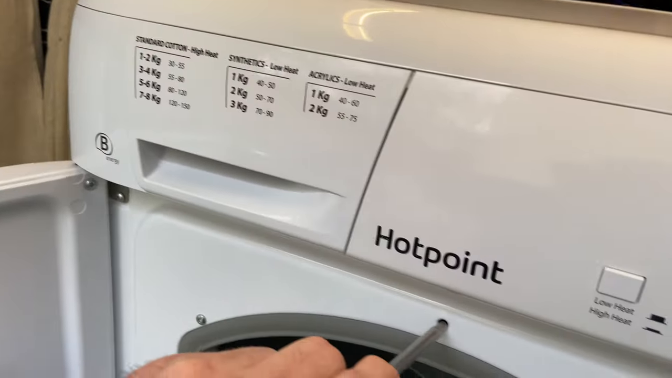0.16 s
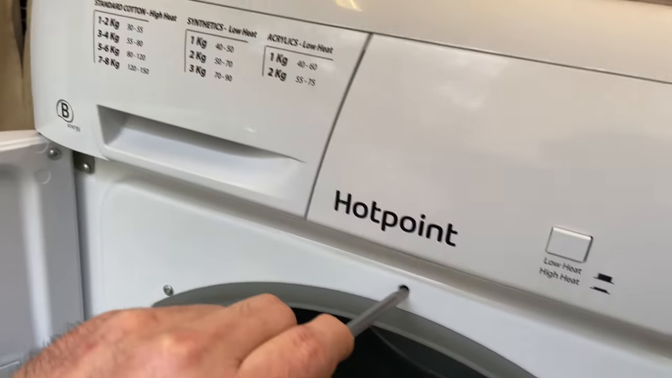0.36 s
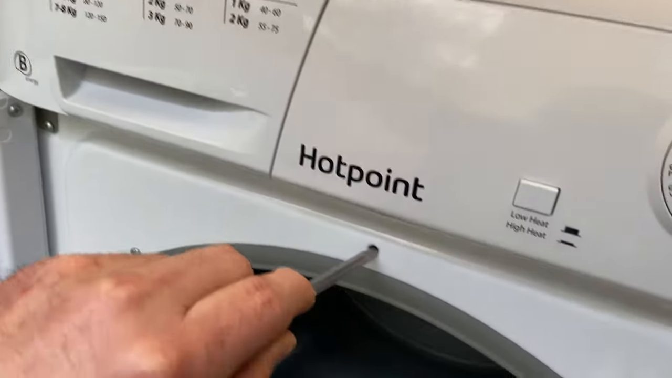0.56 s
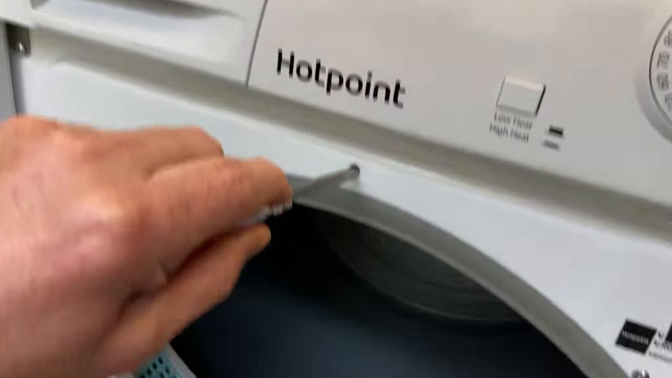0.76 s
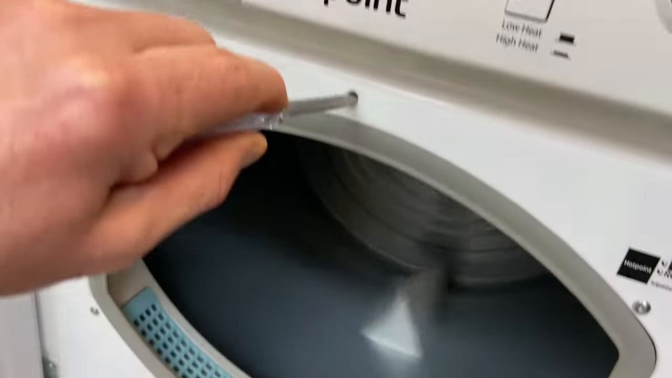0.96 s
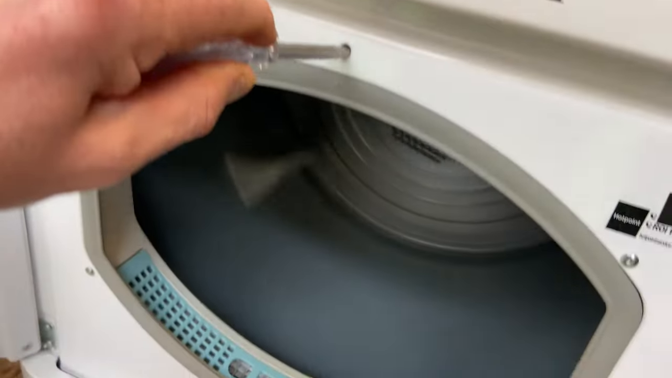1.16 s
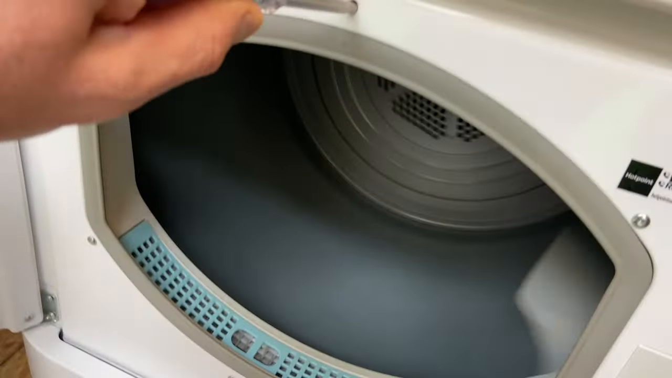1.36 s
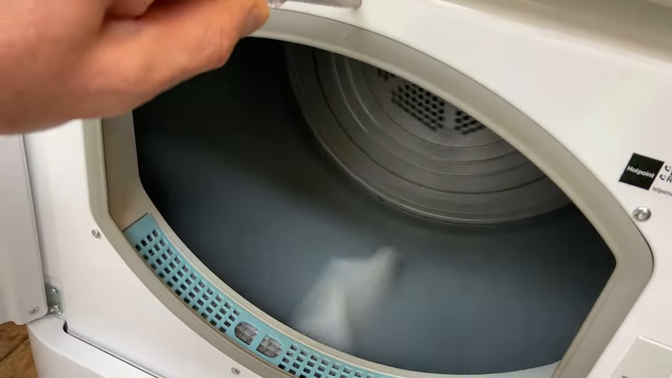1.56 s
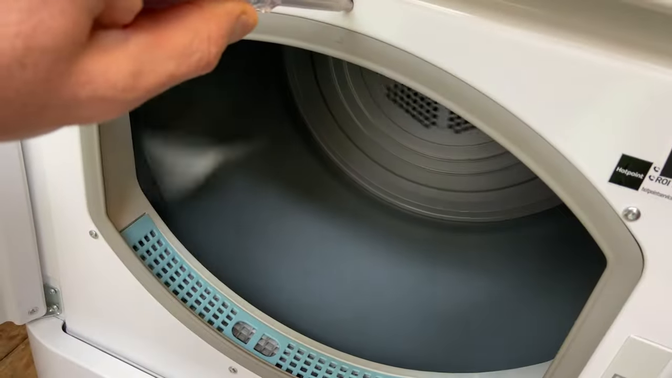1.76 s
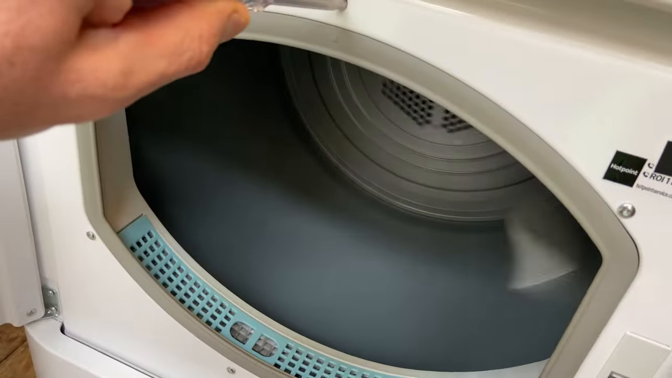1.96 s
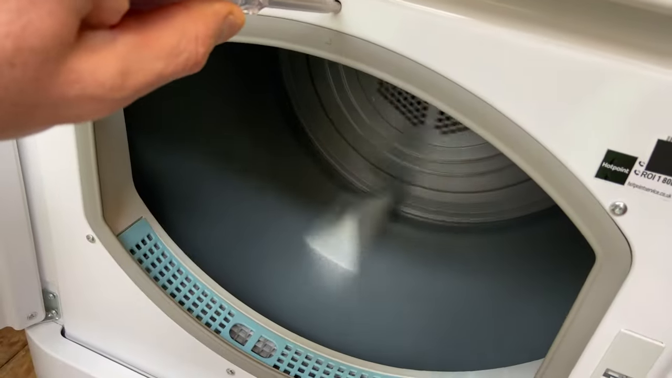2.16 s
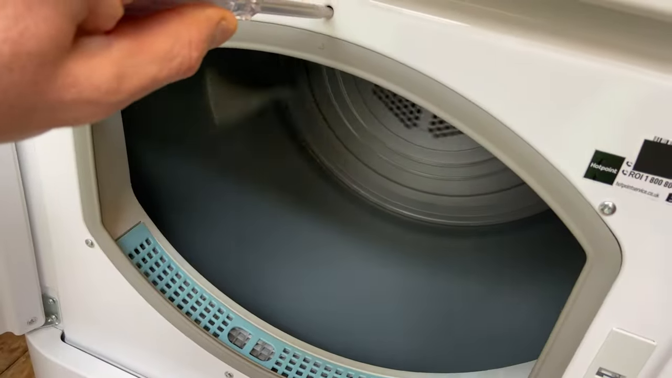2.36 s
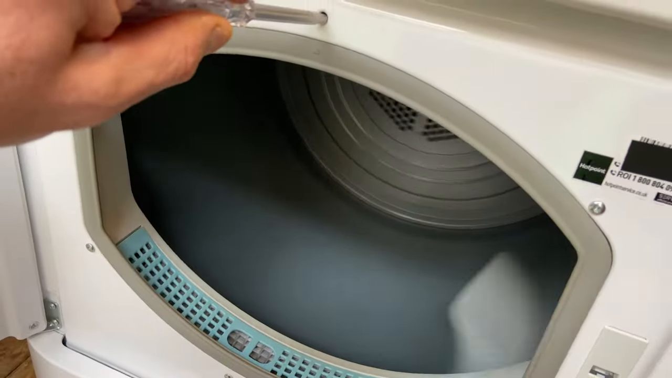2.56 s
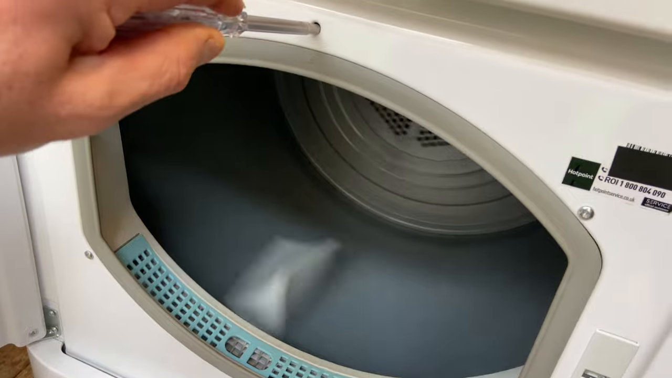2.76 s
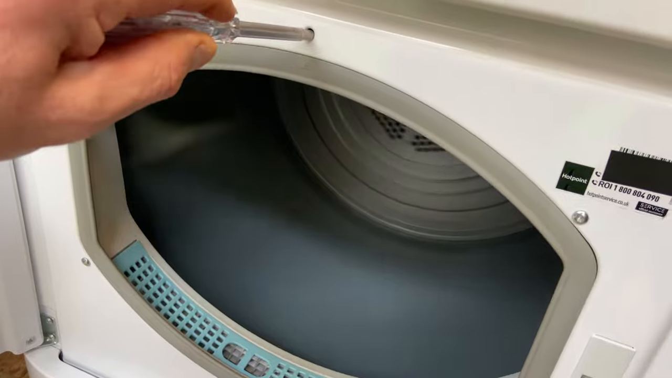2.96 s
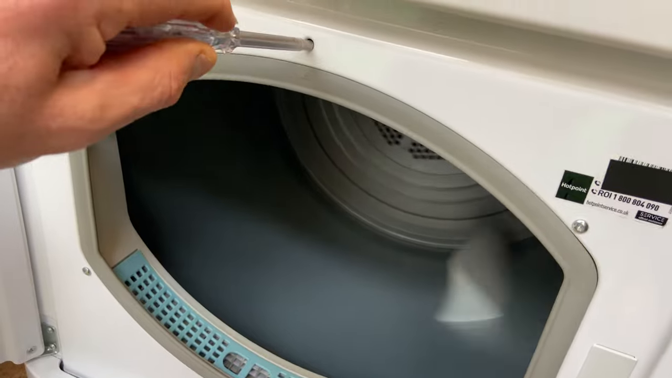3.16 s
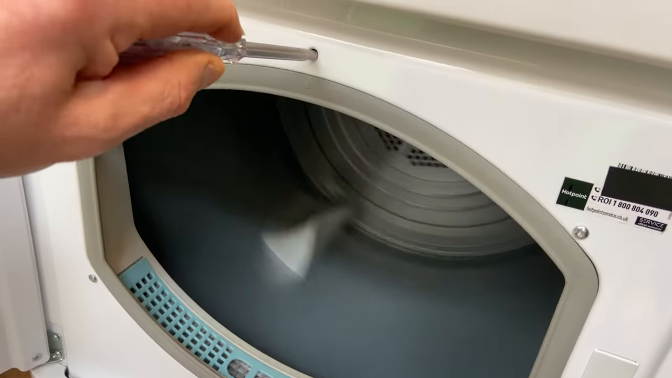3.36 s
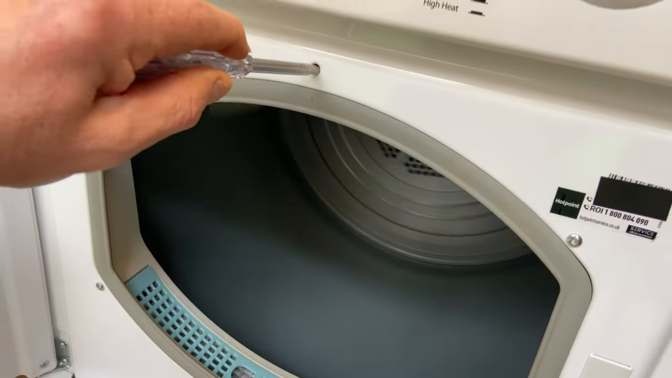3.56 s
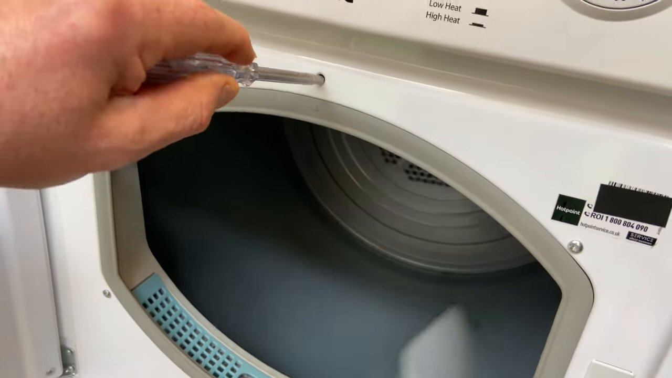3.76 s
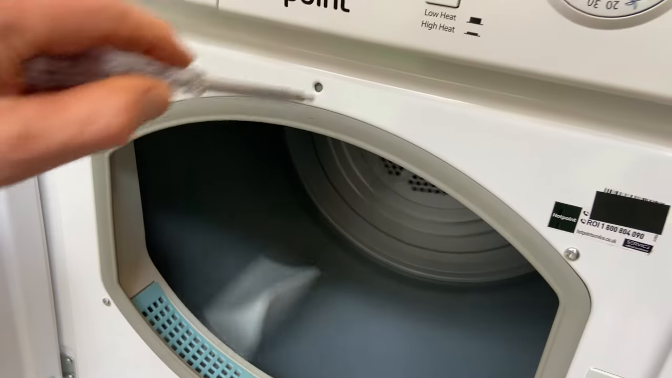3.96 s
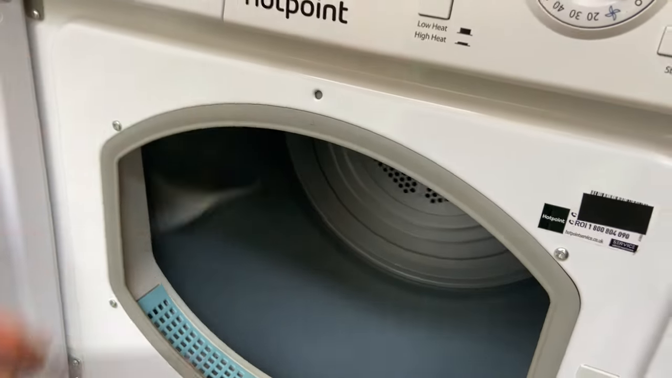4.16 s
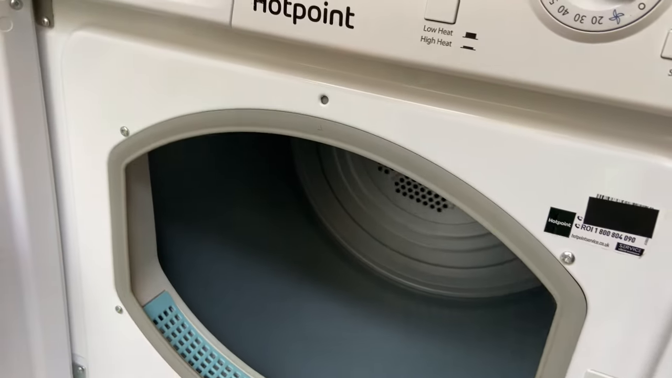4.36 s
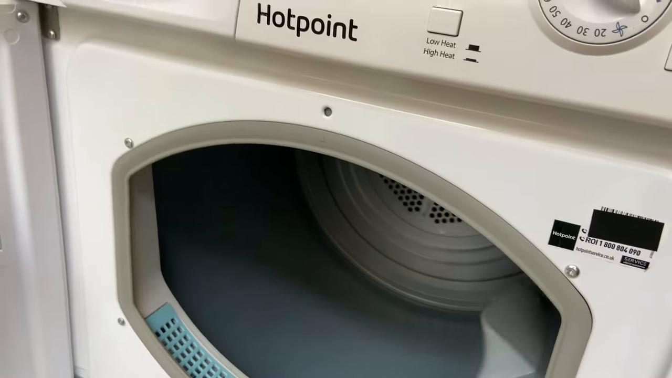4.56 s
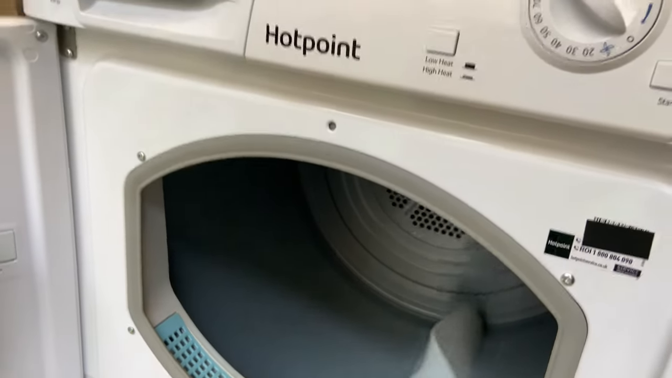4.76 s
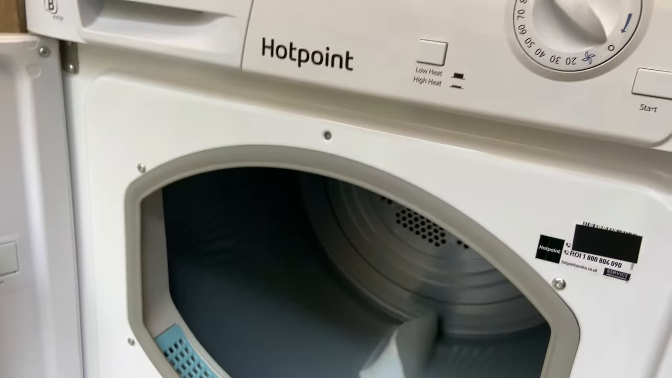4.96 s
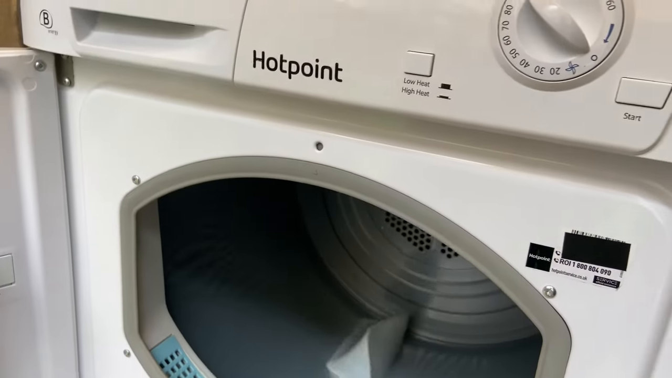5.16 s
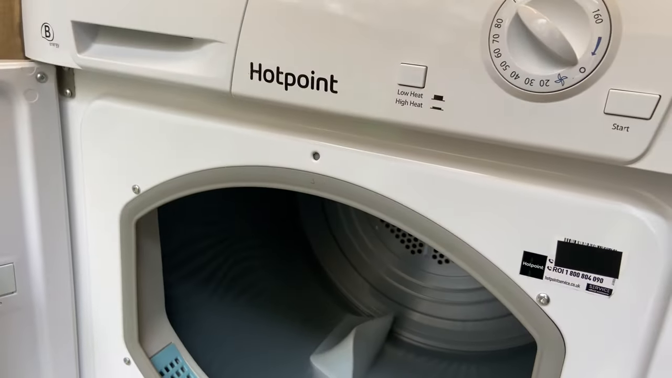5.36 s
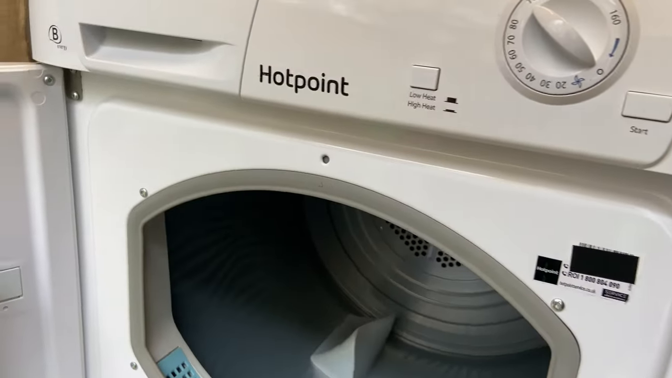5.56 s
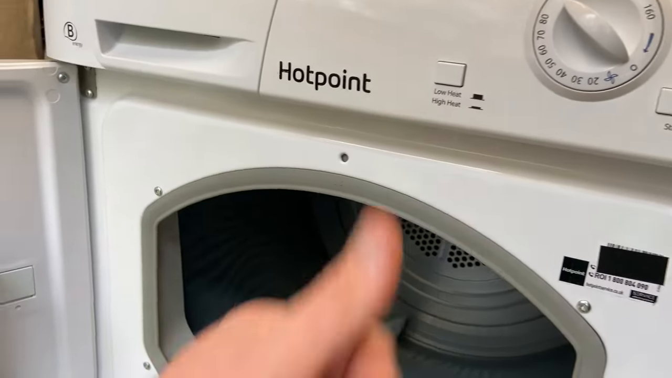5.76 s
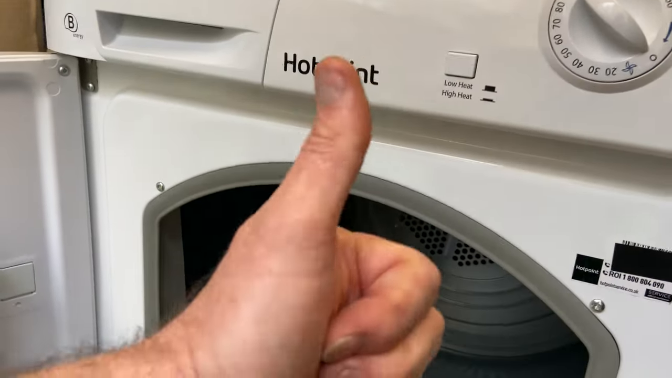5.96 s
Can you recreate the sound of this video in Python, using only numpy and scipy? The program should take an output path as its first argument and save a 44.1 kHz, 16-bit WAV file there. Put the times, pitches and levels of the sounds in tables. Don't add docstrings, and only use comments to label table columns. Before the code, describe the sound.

Indoors, a dryer runs with its door open: low fluttering hum, hollow rushing air and a faint wavering whistle, constant for nearly four seconds. After a light scrape and bright click, the hum drops away quickly and the whoosh sinks. About a second later the metal drum bangs and rattles to a stop, with short high squeaks, then soft low bumps in a quiet room, heard close in stereo.

```python
import sys
import numpy as np
from scipy import signal
from scipy.fft import rfft, irfft, next_fast_len
from scipy.io import wavfile

SR = 44100
rng = np.random.default_rng(int(sys.argv[2]) if len(sys.argv) > 2 else 0)


def output_pcm(signal):
    pcm = np.clip(np.atleast_2d(signal).T, -1, 1) * 32767
    wavfile.write(sys.argv[1], SR, np.round(pcm).astype(np.int16))


def ratio_of_db(decibels):
    return 10 ** (np.asarray(decibels, float) / 20)


N = 264600
POWER_OFF_S = 3.793

# pitch_hz, level_db (per Hz)
ROOM_TONE = [(30, -14), (45, 6.5), (75, -2.5), (140, -8), (250, -16), (500, -25), (1100, -26),
             (2000, -37.5), (3000, -57.5)]
# pitch_hz, likeness (1 = same)
LIKENESS = [(60, 1), (130, 1), (290, 0.82), (640, 0.65), (1410, 0.77), (2150, 0.5), (3100, 0.58),
            (4400, 0.54), (6000, 0.051), (7500, 0.069)]
# pitch_hz, left_minus_right_db
LEFT_DB = [(60, 1.5), (110, -3), (200, 2.5), (380, 0), (700, 3), (1290, 0), (2380, 3), (4400, 3.0),
           (8120, 7.5), (15000, -6.5)]
# start_s, length_s, level_db
SCRAPES = [
    (3.72, 0.12, -41),
    (3.922, 0.094, -46.5),
    (4.07, .09, -53.5),
]
# start_s, length_s, level_db
SQUEAKS = [
    (4.732, 0.028, -49),
    (4.809, 0.047, -53),
    (4.923, .033, -54.5),
]
# pitch_hz, level_db, t60_s
SEAL_MODES = [(3720, -1, .03), (4200, -7, .02), (4930, 0, .035), (7380, -7, .03), (9650, -9, .025),
              (11900, -13, .025), (14000, -12, .02), (15000, -13, .025)]
# start_s, peak_db, pitch_hz
ROCKING = [
    (4.13, -41, 76),
    (4.615, -39.5, 76),
    (5.16, -49.5, 187.4),
    (5.199, -44, 183),
    (5.439, -44.5, 179.5),
    (5.648, -44, 184),
    (5.74, -50, 140),
    (5.839, -45.5, 185),
]
# start_s, level_db, hardness_hz
THUDS = [(4.7206, -23, 400), (4.725, -15.5, 386), (4.748, -19, 330), (4.760, -36, 347), (4.813, -12.5, 242),
         (4.851, -20, 233), (4.878, -27, 180), (4.9215, -26.5, 237), (4.989, -25.5, 277), (5.009, -35, 278),
         (5.046, -28.5, 283), (5.072, -35, 232)]
# pitch_hz, level_db, t60_s
THUD_MODES = [(134.5, -35, 0.085), (169, -8, 0.13), (200.3, -3, 0.14), (250.5, 2.5, 0.064),
              (304, -19, 0.033)]
# start_s, panel_ring_db, crack_db, crack_colour_hz, bright_snap_db
TICKS = [
    (3.809, -60, -32, 4000, -33),
    (4.7201, -17, -19.5, 2360, -24.5),
    (4.725, -34, -32, 2300, -48),
    (4.74, -41, -50, 2300, -52),
    (4.761, -38, -43, 2000, -58),
    (4.809, -35, -26.5, 2200, -38),
    (4.845, -53, -31.5, 2980, -49),
    (4.9852, -50, -28, 1900, -53),
    (5.046, -46.5, -45, 910, -62),
]
# pitch_hz, level_db, t60_s
PANEL_MODES = [(412, -7.5, 0.13), (524, -10, 0.11), (710, -16, 0.093), (989, -1.5, 0.047),
               (1010, -19.5, 0.034), (1107, 0.5, 0.03), (1167, -8, .03), (1780, -16, 0.022),
               (2136, -14.5, .05), (2300, -16, 0.089), (2540, -22, 0.037), (4060, -24, .015),
               (5370, -15.5, 0.017)]
# time_s, level_db
NEARNESS = [(0, -0.5), (.45, -1), (.9, .5), (1.35, 1), (1.55, 0.5), (2.1, 0), (2.55, 0), (3.1, 0),
            (3.55, 0), (3.78, 0), (4, -1)]
# pitch_hz, level_db (per Hz)
HISS = [(2000, 1.5), (3200, -1.5), (4300, -0.5), (5300, -5.5), (6200, -8.5), (7500, -10.5), (10000, -10),
        (16000, -12.5)]
# pitch_hz, level_db (per Hz)
RUSH = [(350, 1), (550, -0.5), (800, 1), (1200, -3), (1800, -7), (2600, -15.5), (4000, -15.5)]
# pitch_hz, level_db (per Hz)
RUMBLE = [(30, -33), (45, -23.5), (70, -3), (110, -4.5), (145, 3.5), (210, -10), (370, -4.5), (600, -20.5)]
# pitch_hz, width_hz, lift_db
CAVITY = [(80, 12, 4), (250, 40, 3), (310, 22, -8), (498, 40, -8), (555, 50, 4), (730, 50, -5),
          (775, 40, 6), (845, 40, 4), (920, 40, 4), (990, 80, -9), (1110, 60, 3), (1330, 110, -6),
          (1415, 60, 6.5), (1490, 50, 4.5), (2090, 80, -4)]
# time_s, turns_per_s
ROTOR = [
    (0, 45.2),
    (3.81, 45.2),
    (4.2, 36.0),
    (4.6, 25.0),
]
# pitch_hz, lead_radians
RIGHT_LEAD = [(400, 0), (1000, -.4), (1700, -.8), (2400, -.4), (3100, -.8), (4200, .2), (5400, .8),
              (6200, -.3)]


def in_time(rows):
    s, value = np.transpose(rows)
    return np.interp(np.arange(N) / SR, s, value)


def at_hz(points, hz):
    pitch_hz, value = np.transpose(points)
    return np.interp(np.log(hz), np.log(np.maximum(pitch_hz, 1)), value)


def since(s):
    return np.maximum(np.arange(N) / SR - s, 0)


def rms_one(x):
    return x / np.sqrt(np.mean(x ** 2) + 1e-20)


def band_pass(x, low_hz, high_hz, order=1):
    return signal.sosfilt(signal.butter(order, [low_hz, high_hz], "band", fs=SR, output="sos"), x)


def drift(rate):
    r = np.exp(-80 * np.pi * rate / SR)
    slow = signal.lfilter([1], [1, -2 * r, r * r], rng.standard_normal(N // 40 + 2002))[2000:]
    return np.interp(np.arange(N) / 40, np.arange(len(slow)), rms_one(slow))


def noise(spectrum, patchy_db, likeness=LIKENESS):
    lowest, highest = spectrum[0][0], spectrum[-1][0]
    edges = lowest * 2 ** np.arange(0, np.log2(highest / lowest) + .1, 1 / 3)
    out, together, white = 0, drift(8.6), rng.standard_normal((2, 2, N))
    for k, (low, high) in enumerate(zip(edges, edges[1:])):
        mid, side = band_pass(white[k % 2], low, high, order=2)
        hz = np.sqrt(low * high)
        alike = np.clip(at_hz(likeness, hz), -1, 1)
        flicker_db = patchy_db * (1.48 * together + drift(12.0))
        gain = ratio_of_db(at_hz(spectrum, hz) + flicker_db)
        pan = ratio_of_db(at_hz(LEFT_DB, hz) * np.array([[.5], [-.5]]))
        out = out + gain * pan * (np.sqrt(1 + alike) * mid + np.sqrt(1 - alike) * side * [[1], [-1]])
    return rms_one(out)


def ring(clicks, hz, t60):
    r, w = ratio_of_db(-60 / (t60 * SR)), 2 * np.pi * hz / SR
    return signal.lfilter([0, np.sin(w)], [1, -2 * r * np.cos(w), r * r], clicks + 1e-18)


def strike(push, modes, strengths):
    return sum(g * ratio_of_db(level_db) * ring(push, hz, t60) for g, (hz, level_db, t60) in zip(strengths, modes))


def room_tone():
    likeness = [(60, 0.98), (290, 0.68), (640, 0), (3000, 0.015)]
    return ratio_of_db(-47) * noise(ROOM_TONE, patchy_db=-0.3, likeness=likeness)


def reverberation(x):
    t60_s, wall_cut_hz = 0.48, 4900
    size = next_fast_len(N + SR)
    turn = np.exp(-2j * np.pi * np.arange(size // 2 + 1) / size)
    dull = np.exp(-2 * np.pi * wall_cut_hz / SR)
    wall = (1 - dull) / (1 - dull * turn)
    answer = np.zeros((2, len(turn)), complex)
    for k, lag in enumerate((rng.uniform(.011, .034, 12) * SR).astype(int)):
        loop = ratio_of_db(-60 * lag / SR / t60_s) * wall * turn ** lag
        answer[k % 2] += (-1) ** (k // 2) * loop / (1 - loop)
    return irfft(rfft(x, size) * answer, size)[:, :N]


def scrapes():
    t, stroke = np.arange(N) / SR, np.zeros(N)
    for s, length_s, level_db in SCRAPES:
        stroke += ratio_of_db(level_db) * np.sin(np.pi * np.clip((t - s) / length_s, 0, 1))
    return stroke * rms_one(band_pass(rng.standard_normal((2, N)), 2500, 9000))


def squeaks():
    t, rub = np.arange(N) / SR, np.zeros(N)
    for s, length_s, level_db in SQUEAKS:
        rub += ratio_of_db(level_db) * np.sin(np.pi * np.clip((t - s) / length_s, 0, 1) ** 0.58)
    rub = 0.078 * rub * rng.standard_normal(N)
    return strike(rub, SEAL_MODES, np.ones(len(SEAL_MODES))) * ratio_of_db([[1.5], [-1.5]])


def rocking():
    out, t = np.zeros(N), np.arange(round(.12 * SR)) / SR
    swell = t / 0.01 * np.exp(1 - t / 0.015)
    for s, level_db, hz in ROCKING:
        at = round(s * SR)
        bump = ratio_of_db(level_db - 0.5) * swell * np.sin(2 * np.pi * hz * t)
        out[at:at + len(t)] += bump[:N - at]
    return out * ratio_of_db([[-1.1], [1.1]])


def drum_thud(t, hardness_hz):
    thud = strike(-1. * (t == 0), THUD_MODES, ratio_of_db(0.76 * rng.standard_normal(len(THUD_MODES))))
    thud = signal.sosfilt(signal.butter(3, hardness_hz, fs=SR, output="sos"), thud)
    return signal.sosfilt(signal.butter(3, 125.0, "high", fs=SR, output="sos"), thud)


def panel_tick(t, panel_db, crack_db, colour_hz, snap_db):
    touches_per_s = 500
    touches = rng.standard_normal(len(t)) * (rng.random(len(t)) < touches_per_s / SR)
    chatter = ratio_of_db(-10.5 - 60 * t / 0.073) * touches
    strengths = ratio_of_db(1.5 * rng.standard_normal((len(PANEL_MODES), 2, 1)))
    swell = np.minimum(t / 0.0034, 1)
    panel = swell * strike((t == 0) + chatter, PANEL_MODES, strengths)

    white = rng.standard_normal((2, len(t)))
    dying = np.minimum(t / 0.002, 1) * ratio_of_db(-60 * t / 0.023) + ratio_of_db(-10 - 60 * t / 0.17)
    burst = dying * white
    crack = band_pass(burst, colour_hz / 1.45, colour_hz * 1.45, order=2)
    crack = crack + ratio_of_db(-12 - 60 * t / .03) * band_pass(burst, 1500, 6000)

    snap = (ratio_of_db(-60 * t / 0.0086) + ratio_of_db(-18 - 60 * t / 0.14)) * white
    snap = band_pass(snap, 4500, 11000)
    return ratio_of_db(panel_db) * panel + ratio_of_db(crack_db) * crack + ratio_of_db(snap_db) * snap


def knocks():
    out, size = np.zeros((2, N + SR)), SR // 4
    t = np.arange(size) / SR
    for s, level_db, hardness_hz in THUDS:
        at = round(s * SR)
        out[:, at:at + size] += ratio_of_db(level_db) * drum_thud(t, hardness_hz)
    for s, *tick in TICKS:
        at = round(s * SR)
        out[:, at:at + size] += panel_tick(t, *tick)
    return out[:, :N]


def coasting(running_db, first_fall, lingering_db, last_fall):
    gone = since(POWER_OFF_S)
    fall = np.maximum(ratio_of_db(-first_fall * gone), ratio_of_db(lingering_db - last_fall * gone))
    return ratio_of_db(running_db + in_time(NEARNESS)) * fall


def last_fade():
    return ratio_of_db(-np.minimum(260 * since(5.3) ** 2, 21))


def fan_hiss():
    gain = coasting(running_db=-43, first_fall=40, lingering_db=-4, last_fall=14.5)
    return ratio_of_db(2.5) * gain * last_fade() * noise(HISS, patchy_db=0.7)


def blades():
    blade_count, width_hz = 24, 5.6
    angle = 2 * np.pi * blade_count * np.cumsum(in_time(ROTOR)) / SR
    return ratio_of_db(-14) * (drift(width_hz) * np.cos(angle) + drift(width_hz) * np.sin(angle))


def cavity(x):
    for hz, width_hz, lift_db in CAVITY:
        g, q, c = ratio_of_db(lift_db / 2), np.pi * width_hz / SR, -2 * np.cos(2 * np.pi * hz / SR)
        x = signal.lfilter([1 + q * g, c, 1 - q * g], [1 + q / g, c, 1 - q / g], x)
    return x


def drum_air():
    rumble = coasting(running_db=-28.5, first_fall=24, lingering_db=-23, last_fall=11)
    rush = coasting(running_db=-30, first_fall=28.5, lingering_db=-3, last_fall=20.5) * last_fade()
    air = rumble * noise(RUMBLE, patchy_db=0.48) + rush * noise(RUSH, patchy_db=0.52)
    return cavity(air) + rush * blades()


def motor():
    mains_hz, in_step_s = 100, .0627
    drum_turn_s, heavy_side_s = 1.2, .85
    t, gone = np.arange(N) / SR, since(POWER_OFF_S)

    twice_db = -28 + .9 * in_time(NEARNESS) - 1.5 * np.exp(-t / .3)
    twice_db = twice_db - 42 * since(POWER_OFF_S - .1)
    mains_db = -36.5 + 4.5 * np.cos(2 * np.pi * (t - heavy_side_s) / drum_turn_s) - 198 * gone
    once_db = -47.5 + 5 * drift(1.5) - 13.5 * gone

    turns = np.cumsum(in_time(ROTOR)) / SR - ROTOR[0][1] * in_step_s
    twice = ratio_of_db(twice_db) * np.cos(4 * np.pi * turns)
    mains = ratio_of_db(mains_db) * np.cos(2 * np.pi * mains_hz * (t - in_step_s))
    once = ratio_of_db(once_db) * np.cos(2 * np.pi * turns)
    return np.sqrt(2) * (twice + mains + once) * ratio_of_db([[.7], [-.7]])


def scene():
    blows = knocks() + squeaks()
    wet = ratio_of_db(-20) * reverberation(blows.mean(axis=0))
    handling = scrapes() + rocking() + blows + wet
    machine = fan_hiss() + drum_air() + motor()
    return room_tone() + handling + machine


def low_pass(x):
    return signal.sosfilt(signal.butter(12, 16990, fs=SR, output="sos"), x)


def record(dry):
    treble_from_hz, in_phase_hz, phase_turn_hz = 6400, 6900, 4300
    size = N + SR // 10
    hz, sides = np.fft.rfftfreq(size, 1 / SR) + 0.00085, rfft(dry, size)
    halves = np.array([[-.5j], [.5j]])
    share = np.clip((hz - treble_from_hz) / 1900 + .42, 0, .985)
    middle = sides * np.exp(halves * at_hz(RIGHT_LEAD, hz))
    treble = sides[0] * np.exp(halves * 2 * np.pi * (hz - in_phase_hz) / phase_turn_hz)
    heard = irfft(np.sqrt(1 - share ** 2) * middle + share * treble)[:, :N]
    heard = signal.sosfilt(signal.butter(3, 38, "high", fs=SR, output="sos"), heard)
    heard = signal.sosfilt(signal.cheby2(14, 60, 16250, fs=SR, output="sos"), heard)
    return low_pass(heard)


dry = scene()
out = record(dry)
output_pcm(out)
```